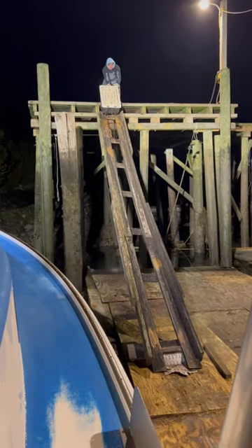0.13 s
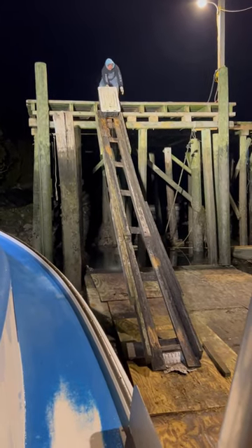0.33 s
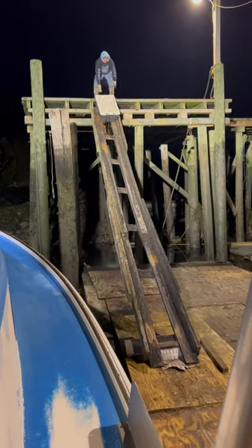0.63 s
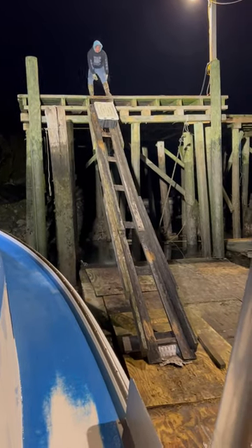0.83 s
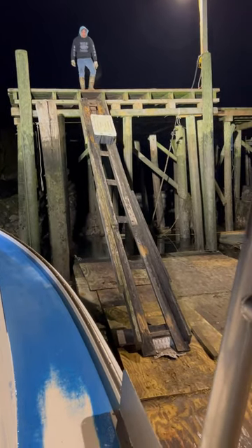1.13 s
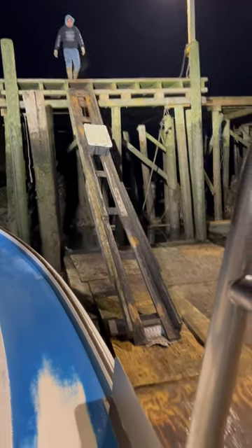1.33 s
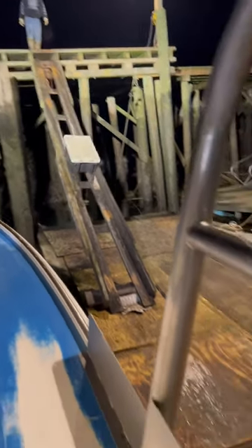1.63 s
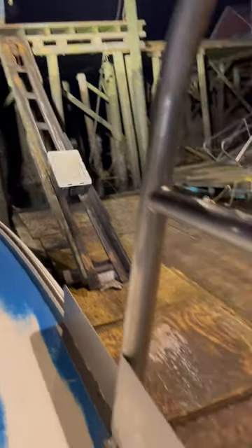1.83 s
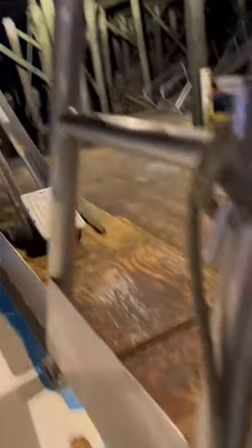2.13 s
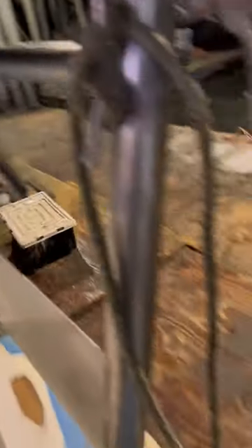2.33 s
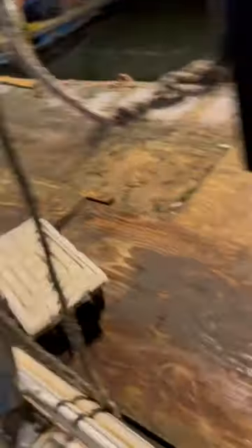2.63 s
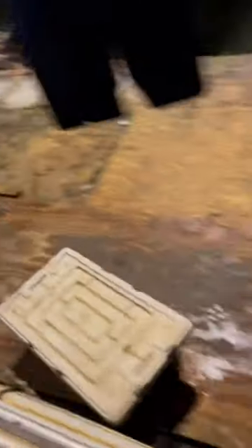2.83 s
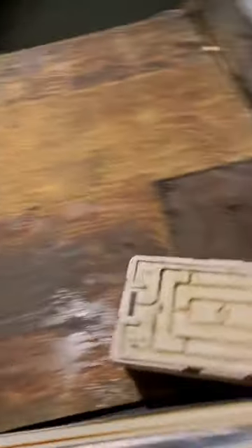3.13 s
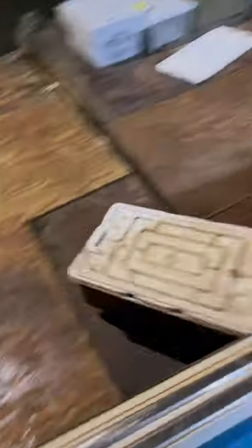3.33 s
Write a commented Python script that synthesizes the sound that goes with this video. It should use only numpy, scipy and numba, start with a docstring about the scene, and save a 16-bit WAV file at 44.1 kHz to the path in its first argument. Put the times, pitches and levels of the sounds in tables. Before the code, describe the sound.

A plastic crate knocks and scrapes down a wooden ramp, thuds onto planks, skids loudly and bangs against a boat's side. A boat engine idles low throughout, with faint water drips at first, picked up by a phone at a wharf.

```python
"""At a wharf, a plastic crate slides down a wooden ramp, knocks over the joints, lands on the planks,
skids towards a moored boat and bangs against its side. Friction and impact excite the resonant modes of
crate, wood and hull. Behind them water spatters in random ticks, and the boat's idling engine sounds
harmonics of its cycle. A phone picks it all up, its gain control ducking after loud blows."""
import sys
import numpy as np
from scipy import signal
from scipy.fft import rfft, irfft, next_fast_len
from scipy.io import wavfile
from scipy.ndimage import map_coordinates
from numba import njit

SR = 44100
rng = np.random.default_rng(int(sys.argv[2]) if len(sys.argv) > 2 else 0)


def file_out(sig):
    """Save sig as 16-bit WAV at sys.argv[1]."""
    # one column per channel
    cols = np.atleast_2d(sig).T
    # limit, then scale
    lim = np.clip(cols, -1, 1)
    pcm = np.round(lim * 32767).astype(np.int16)
    wavfile.write(sys.argv[1], SR, pcm)


N = 154350


# Modes of the crate, the ramp's boards and the rails' whistle: (frequency [Hz], bandwidth [Hz], gain [dB])
CRATE_MODES = [(394, 30, -6), (632, 178, -2), (759, 350, -3.5), (1050, 393, -5.5), (1440, 340, -5),
               (1840, 410, -9.5), (2335, 370, -9), (3120, 1900, -23.5)]
RAMP_MODES = [(150, 61, -1.5), (201, 39, 4), (270, 57.6, 3), (356, 50, 2.5), (404, 86, -3.5)]
WHISTLE_MODES = [(4250, 430, 0)]
# Friction spectra: (frequency [Hz], spectral level [dB])
SCRAPE_SPECTRUM = [(410, -56), (700, -8.5), (1030, -14.5), (1460, 0), (2480, 0.5), (3600, -6.5),
                   (4840, -18), (5000, -59), (6500, -45), (11000, -120)]
HISS_SPECTRUM = [(3500, -6), (4500, -6.5), (6000, 2), (8000, -3), (11000, -6.5), (16000, -48)]
# Course of the slide: (time [s], scrape [dB], hiss [dB], whistle [dB], rumble [dB])
SLIDE_LEVELS = [(.62, -47, -65, -70, -26), (.75, -42, -58, -54, -24.5), (1.25, -36, -41, -55, -29.5),
                (1.45, -32.5, -36.5, -50, -29), (1.6, -43, -39, -36, -23), (1.69, -39.5, -42.5, -43, -28),
                (1.74, -34, -27.5, -32, -24), (1.795, -46, -31, -42, -40), (1.815, -48, -47, -52, -27),
                (1.9, -27, -29.5, -30, -14.5), (2.0, -32, -29, -32, -19), (2.09, -30.5, -36.5, -38, -21.5),
                (2.17, -23, -35, -39, -13), (2.22, -32, -42, -65, -19.5), (2.36, -30.5, -42, -73, -20),
                (2.38, -20, -34, -50, -30), (2.43, -20, -36, -60, -33), (2.455, -27, -35, -58, -30),
                (2.57, -29.5, -42, -50, -20), (2.66, -15.5, -19, -67, -10), (2.8, -14.5, -22, -60, -18.5),
                (2.86, -15, -27.5, -60, -20), (2.9, -18.5, -23, -60, -14.5), (2.93, -15, -31.5, -63, -16),
                (2.98, -18, -28, -50, -17), (3.05, -23.5, -38, -61, -16), (3.11, -26.5, -34, -60, -23),
                (3.155, -35, -46, -60, -23.5), (3.27, -36, -40, -60, -24.5), (3.39, -38, -55, -62, -26.5),
                (3.42, -31, -38, -62, -23), (3.5, -40.5, -47, -70, -25.5)]

def crate_slide(echo_gain=.35, final_lag_s=.0035):
    """Sliding friction: runners rubbing on wood make noise that drives crate, rails and boards."""
    scrape, hiss, whistle, rumble = envelopes(SLIDE_LEVELS)
    judder = amp(1.5 * wobble(90) + .4 * wobble(25))
    rub = judder * grit(per_s=1300, spread_db=3, smooth=1)
    # The reflection off the hull arrives ever later: a sweeping comb filter.
    i = np.arange(N)
    lag = final_lag_s * SR * np.exp(4 * (i / N - 1))
    rub = rub + echo_gain * np.interp(i - lag, i, rub)
    fine_rub = amp(2.1 * wobble(50)) * grit(per_s=4400, spread_db=-6, smooth=.63)
    rail_rub = amp(1.8 * wobble(40.1)) * rng.standard_normal(N)
    board_rub = judder * grit(per_s=330, spread_db=3.5, smooth=.86)
    return (scrape * coloured(rub, SCRAPE_SPECTRUM)
            + hiss * coloured(fine_rub, HISS_SPECTRUM)
            + whistle * unit(resonate(rail_rub, WHISTLE_MODES))
            + rumble * unit(resonate(board_rub, RAMP_MODES + CRATE_MODES[1:4])))


# Crack of a contact: (frequency [Hz], gain [dB])
CRACK_SPECTRUM = [(800, 14), (2000, 18.5), (4000, 6), (8000, 4.5), (16000, -13)]

def impacts(contacts, low_modes, high_modes, rise, note_gain=1.2, push_s=.0012):
    """Impact excitation: each contact pushes a low body, chatters on it and a high one, and cracks."""
    drive, t = np.zeros((3, N + SR)), np.arange(SR // 10) / SR
    push = t / push_s * np.exp(-2 * t / push_s)
    for start, *levels, contact_s, note_hz in contacts:
        envelope = np.exp(-t / max(contact_s, .001)) * (1 - np.exp(-t / (rise * contact_s)))
        chatter = rng.standard_normal((3, len(t))) * envelope  # rows: low body, high body, crack
        chatter[:2] += note_gain * envelope * np.sin(2 * np.pi * note_hz * t)
        chatter /= np.linalg.norm(chatter, axis=1, keepdims=True)
        chatter[0] += 2 * push / push.sum()
        chatter[2] /= np.abs(chatter[2]).max()
        drive[:, round(start * SR):][:, :len(t)] += amp(levels)[:, None] * chatter
    low, high, crack = drive[:, :N]
    dull = filtered(low, lambda hz: 1 / (1 + 1j * hz / 1630))
    return resonate(dull, low_modes) + resonate(high, high_modes) + equalised(crack, CRACK_SPECTRUM)


# Modes of the planks, the hull's boom and the clang: (frequency [Hz], bandwidth [Hz], gain [dB])
PLANK_MODES = [(146, 23, 4), (203.5, 24, 9), (272, 59, 3.5), (394, 103, 1), (473, 146, -4)]
HULL_MODES = [(78, 29, -1), (205, 68, -6.5), (321, 122, -9)]
CLANG_MODES = [(715, 230, 7), (1050, 330, 7), (1365, 300, 12), (1908, 62, 6.5), (2510, 310, 1.5),
               (3300, 940, -0.5)]
# Contacts: (time [s], low body [dB], high body [dB], crack [dB], contact time [s], note [Hz])
RAMP_KNOCKS = [(.642, -10.5, -16.5, -41, 0.0052, 804), (.685, -1, -3, -19, 0.0075, 752),
               (1.098, -17, -23.5, -36, 0.0074, 2030), (1.160, -10, -11.5, -24, 0.003, 527),
               (1.515, -15, -21, -54, 0.0061, 677), (1.8275, -13, -1.5, -55, 0.0025, 540),
               (1.836, -34, -13, -46, 0.0048, 1047), (1.855, -15, -14.5, -32, 0.004, 2390),
               (1.872, 2.5, -4, -13, 0.0027, 750), (2.060, -15, -16, -34, 0.002, 1000)]
PLANK_LANDINGS = [(2.115, -9, 3.5, -5, 0.0053, 498), (2.132, 9, -3, -9.5, 0.0071, 813),
                  (2.150, -5, -9, -13, 0.0027, 344), (2.234, 5.5, 0, -8.5, 0.0046, 599),
                  (2.288, -7.5, -12, -24, 0.0017, 480), (2.321, -11, -35.5, -13, 0.0008, 610),
                  (2.401, -3, -14, -28, 0.0023, 1050), (2.587, -0.5, 0, -10, 0.0019, 483),
                  (2.607, -7.5, -20, -35, 0.019, 144), (2.6445, -3, 1, -19, 0.0064, 264),
                  (3.407, -6, -16, -26, 0.0078, 628)]
BOAT_BANGS = [(3.168, -4, 3, -11.5, 0.0047, 1032), (3.186, 0.5, -13, -7, 0.0048, 1070),
              (3.197, 2, -6.5, -12, 0.0084, 700), (3.209, 5.5, -21, -22, 0.0059, 1430),
              (3.2155, -19, 4.5, 0, 0.0019, 2450), (3.2275, 0, 8.5, -2, 0.0038, 1983)]

def crate_blows():
    """Free vibration: bodies ring in their own modes as the crate strikes ramp, planks and boat."""
    return (impacts(RAMP_KNOCKS, RAMP_MODES, CRATE_MODES, rise=.1)
            + impacts(PLANK_LANDINGS, PLANK_MODES, CRATE_MODES, rise=.16)
            + impacts(BOAT_BANGS, HULL_MODES, CLANG_MODES, rise=.6))


# Engine harmonics: (order [multiple of the cycle rate], relative level [dB])
ENGINE_ORDERS = [(6, -18.5), (9, -10.5), (10, -26), (11, -19.5), (12, -0.5), (13, -11), (16, -13.5),
                 (17, -34), (18, -8), (21, -37), (23, -15.5), (24, -12.5), (30, -21.5), (34, -18.5)]
# Exhaust noise: (frequency [Hz], spectral level [dB])
EXHAUST_SPECTRUM = [(20, -41), (60, -28), (110, 0.5), (170, -2.5), (230, -15), (290, -6), (360, -9.5),
                    (430, -4), (620, -19), (1010, -24), (1400, -28), (2500, -35), (5000, -48), (16000, -68)]
# Change as the phone turns away: (time [s], engine gain [dB], whine gain [dB])
ENGINE_FACING = [(0, 1, 13), (1.8, 6, 13.5), (2.3, 5, -16), (2.9, 9.5, -18), (3.5, -6.5, -15)]

def boat_engine(cycle_hz=5.439, whine_hz=1028):
    """Periodic excitation: six firings a cycle give harmonics and exhaust puffs, under a faint whine."""
    t = np.arange(N) / SR
    turn = 2 * np.pi * cycle_hz * (t - .0146)
    harmonics = np.zeros(N)
    for order, db in ENGINE_ORDERS:
        level = np.sqrt(2) * amp(db - .15 * wobble(7.95))
        phase = rng.uniform(0, 2 * np.pi) if order % 3 else 3.9  # every third locks to the firings
        harmonics += level * np.cos(order * turn + phase)
    # One cylinder thuds once a cycle.
    beats = np.zeros(N)
    onsets = np.round(np.arange(.122, N / SR, 1 / cycle_hz) * SR).astype(int)
    beats[onsets] = amp(-40 + 1.2 * rng.standard_normal(len(onsets)))
    soft_beats = filtered(beats, lambda hz: np.exp(-(hz / 330) ** 2))
    thuds = resonate(soft_beats, [(161, 12, -1.5)])
    puffs = amp(1.5 * np.cos(6 * turn) - .5 * np.cos(12 * turn) + 1.5 * wobble(15))
    whine = np.sin(2 * np.pi * whine_hz * t + 1.14 * wobble(30))
    exhaust = coloured(puffs * rng.standard_normal(N), EXHAUST_SPECTRUM)
    idle = amp(-17.5) * harmonics + thuds + amp(-23) * exhaust
    idle_gain, whine_gain = envelopes(ENGINE_FACING)
    return idle_gain * idle + whine_gain * amp(-48.5) * whine


# Course of the spatter: (time [s], level [dB])
SPATTER_LEVELS = [(0.0, -45), (0.16, -35.5), (0.55, -50), (0.688, -44.5), (0.744, -44), (1.2, -56)]
# Spray: (frequency [Hz], spectral level [dB])
SPRAY_SPECTRUM = [(1180, -50), (2000, -19), (2510, -10), (2860, -2), (4950, -11.5), (6820, -2.5),
                  (11000, -15), (14300, -34), (22000, -120)]
# Single drips: (time [s], level [dB])
LOUD_DRIPS = [(.006, -26), (.128, -14), (.205, -32), (.302, -22), (.387, -34), (.493, -25), (0.568, -33),
              (.6, -24)]

def water_spatter(drip_decay_s=.0011):
    """Shot noise: drops falling at random merge into a bright ticking, with a few louder drips."""
    level, = envelopes(SPATTER_LEVELS)
    drips, t = np.zeros(N), np.arange(200) / SR
    decay = np.exp(-t / drip_decay_s)
    for start, db in LOUD_DRIPS:
        drips[round(start * SR):][:len(t)] += amp(db) * rng.standard_normal(len(t)) * decay
    spray = amp(2.1 * wobble(72.1)) * grit(per_s=350, spread_db=11, smooth=1)
    return level * coloured(spray, SPRAY_SPECTRUM) + equalised(drips, HISS_SPECTRUM)


# Decay at the wharf: (frequency [Hz], reverberation time [s])
WHARF_T60 = [(200, 0.31), (800, 0.19), (2500, 0.093), (10000, 0.083)]

def wharf_reverb(x, tail_s=.4, delay_samples=300):
    """Reverberation: dense reflections form a noise tail, each band decaying at its own rate."""
    hz, t, bands = signal.stft(rng.standard_normal(int(SR * tail_s)), SR, nperseg=128)
    decay = amp(-60 * t / along(WHARF_T60, hz)[:, None])
    tail = signal.istft(bands * decay, SR, nperseg=128)[1]
    return signal.fftconvolve(np.pad(x, (delay_samples, 0)), tail / np.linalg.norm(tail))[:N]


# Stereo width: (frequency [Hz], side gain [dB])
SIDE_GAIN = [(30, -84), (125, -29.5), (500, -13), (1500, -18), (2500, -28.5), (4800, 2.5), (6500, -18.5),
             (9000, 0), (15000, 15.5)]

def stereo_side(mid, scattered_share=.46):
    """Decorrelation: a random-phase copy and a quadrature copy of the mid signal give width."""
    bands = signal.stft(mid, nperseg=256)[2]
    bands = bands * np.exp(2j * np.pi * rng.random(bands.shape))
    scattered = np.sqrt(2) * signal.istft(bands, nperseg=256)[1][:N]
    quadrature = filtered(mid, lambda hz: 1j * amp(along(SIDE_GAIN, hz)))
    return scattered_share * equalised(scattered, SIDE_GAIN) + (1 - scattered_share) * quadrature


def resonate(x, modes):
    """Modal superposition: resonators of alternating sign, scaled so that a unit click peaks at 1."""
    def response(hz):
        return sum((-1) ** k * amp(db) * 1j * hz * width / (centre ** 2 - hz ** 2 + 1j * hz * width)
                   for k, (centre, width, db) in enumerate(modes))
    click = np.eye(1, N)[0]
    return filtered(x, response) / np.abs(filtered(click, response)).max()


def grit(per_s, spread_db, smooth):
    """Poisson process: clicks of uneven size over a share of smooth noise."""
    clicks = (rng.random(N) < per_s / SR) * amp(spread_db * rng.uniform(-.62, 1, N))
    clicks *= np.sign(rng.standard_normal(N))
    return unit(clicks) + smooth * rng.standard_normal(N)


def wobble(per_s):
    """Random modulation: a spline through per_s random knots a second."""
    knots = rng.standard_normal(int(N * per_s / SR) + 4)
    return map_coordinates(knots, [np.arange(N) * per_s / SR])


def envelopes(rows):
    """Amplitude envelopes: one per dB column, -90 dB outside the table's times."""
    times, *columns = np.transpose(rows)
    return [amp(np.interp(np.arange(N) / SR, times, db, left=-90, right=-90)) for db in columns]


def filtered(x, response):
    """Linear filtering: the spectrum of x times a complex frequency response."""
    size = next_fast_len(N + SR // 2)
    return irfft(rfft(x, size) * response(np.fft.rfftfreq(size, 1 / SR)), size)[..., :N]


def equalised(x, spectrum):
    """Zero-phase filtering by (frequency [Hz], gain [dB]) points."""
    return filtered(x, lambda hz: amp(along(spectrum, hz)))


def coloured(x, spectrum):
    """Spectral shaping at unit rms."""
    return unit(equalised(x, spectrum))


def along(points, hz):
    """Interpolation on a logarithmic frequency axis."""
    frequencies, values = np.transpose(points)
    return np.interp(np.log(hz + 1), np.log(frequencies + 1), values)


def amp(db):
    """Decibels to amplitude ratio."""
    return 10 ** (np.asarray(db) / 20)


def unit(x):
    """Normalisation to unit rms."""
    return x / np.sqrt(np.mean(x ** 2) + 1e-20)


# Colour of the front microphone: (frequency [Hz], gain [dB])
MIC_RESPONSE = [(4950, -2), (5300, 1), (11600, -0.6)]

def scene(mid_top_hz=11900, lean_left_db=.21):
    """Superposition: the sources sum to a mid signal; a side signal sets left and right apart."""
    blows = crate_blows()
    mid = blows + amp(-11) * wharf_reverb(blows) + crate_slide() + water_spatter() + boat_engine()
    side = stereo_side(mid)
    mid = filtered(mid, lambda hz: amp(along(MIC_RESPONSE, hz)) * (hz < mid_top_hz))
    return np.array([mid * amp(lean_left_db) + side, mid * amp(-lean_left_db) - side])


@njit
def follow(rectified, attack_s, release_s):
    """Envelope detection: one time constant for rising, another for falling."""
    out, level = np.zeros(len(rectified)), 0.0
    for i, sample in enumerate(rectified):
        level += (sample - level) / (SR * (attack_s if sample > level else release_s))
        out[i] = level
    return out


def record(dry, threshold_db=-14.5, slope=.73, ceiling=.95, top_hz=15900):
    """Dynamic compression: the gain ducks after loud blows, ahead of a soft ceiling and a band limit."""
    level = follow(np.abs(dry).max(0), attack_s=.032, release_s=.11)
    ducked = dry * np.maximum(level / amp(threshold_db), 1) ** -slope
    limited = ducked / (1 + np.abs(ducked / ceiling) ** 6) ** (1 / 6)
    return filtered(limited, lambda hz: hz < top_hz)


dry = scene()
out = record(dry)
file_out(out)
```